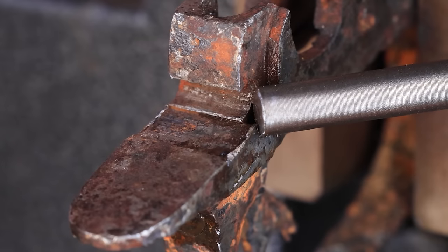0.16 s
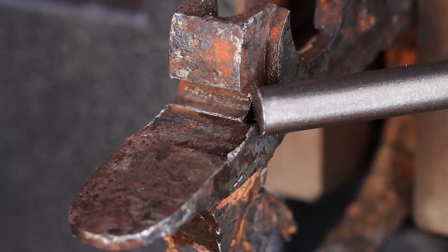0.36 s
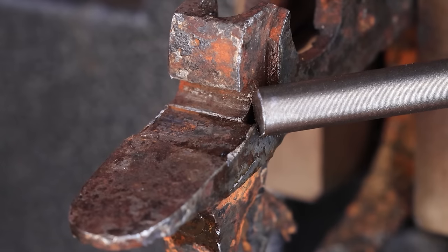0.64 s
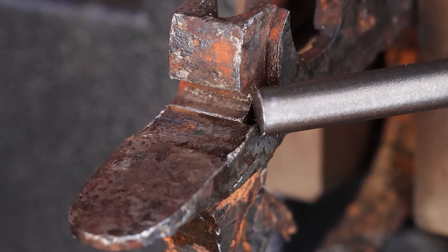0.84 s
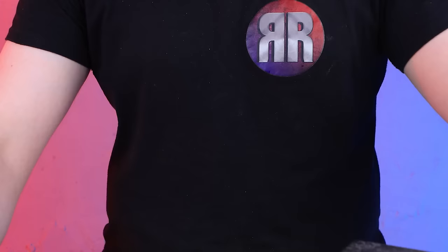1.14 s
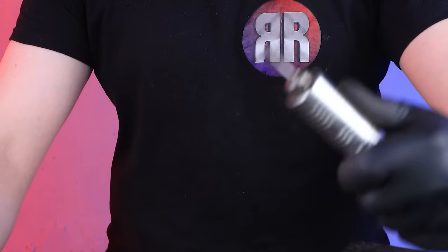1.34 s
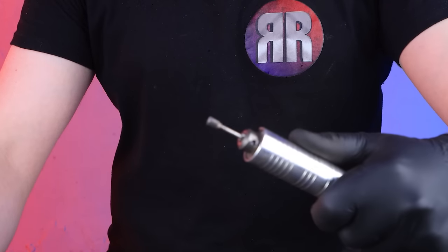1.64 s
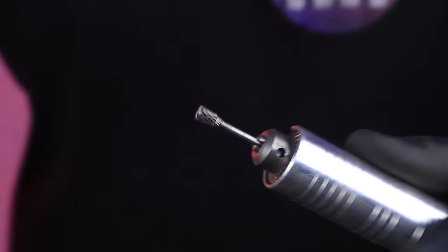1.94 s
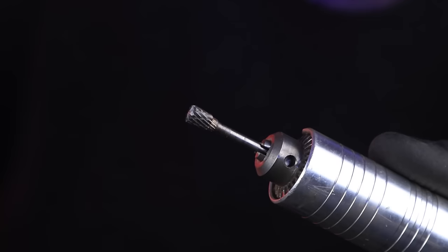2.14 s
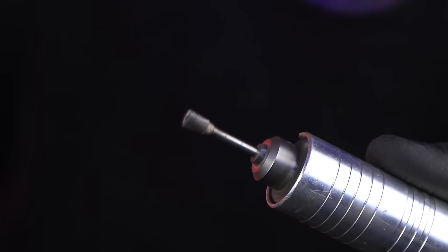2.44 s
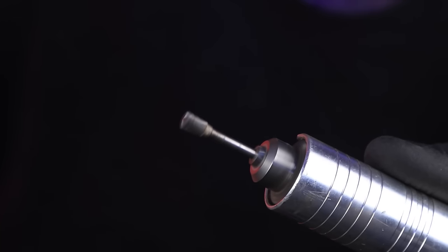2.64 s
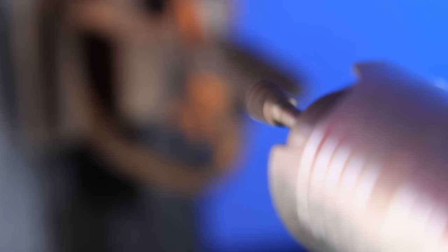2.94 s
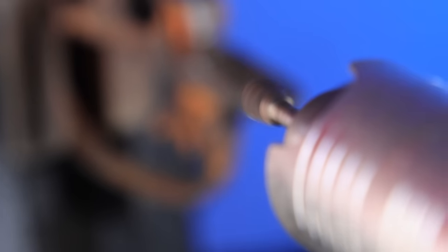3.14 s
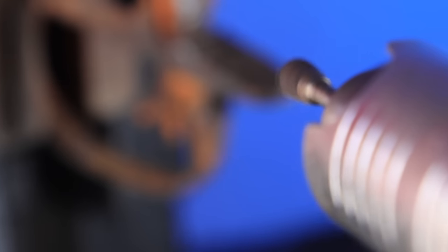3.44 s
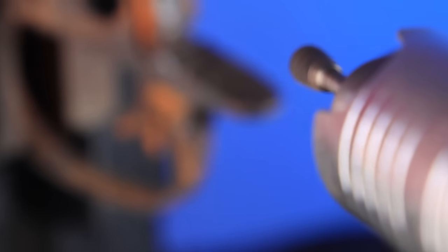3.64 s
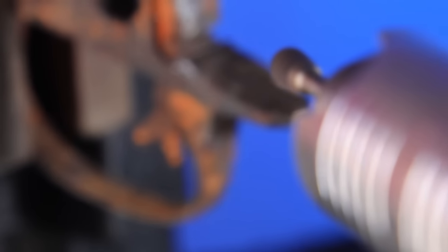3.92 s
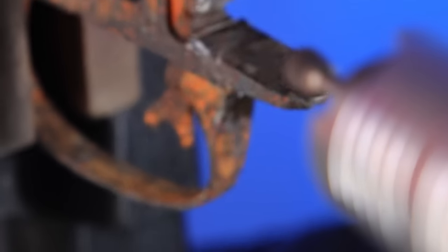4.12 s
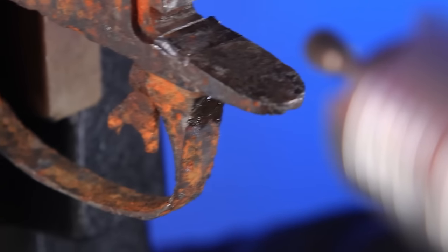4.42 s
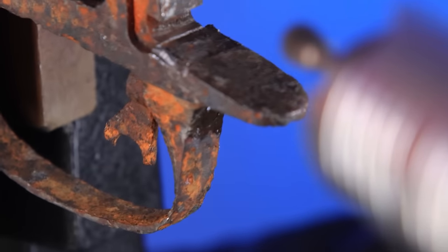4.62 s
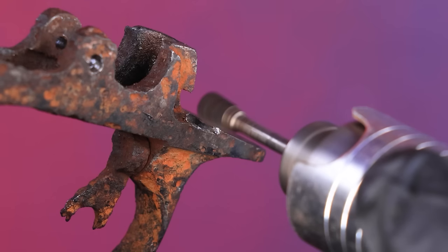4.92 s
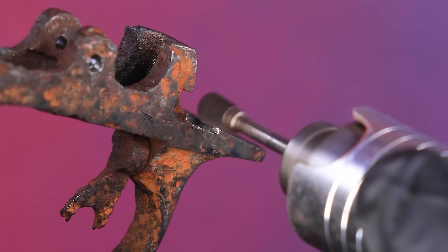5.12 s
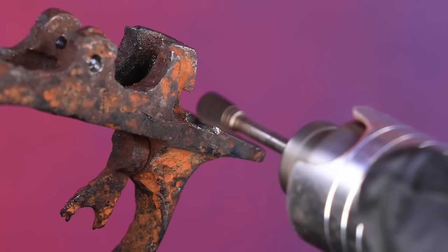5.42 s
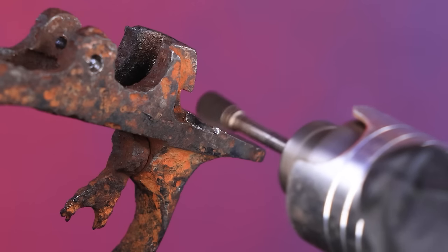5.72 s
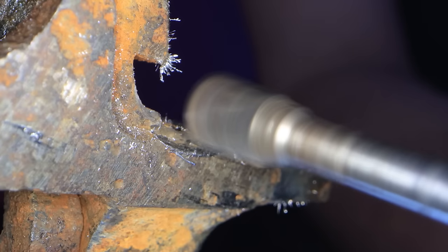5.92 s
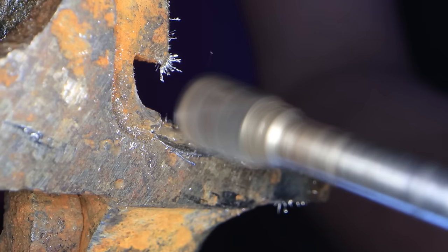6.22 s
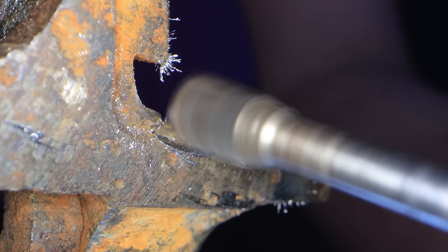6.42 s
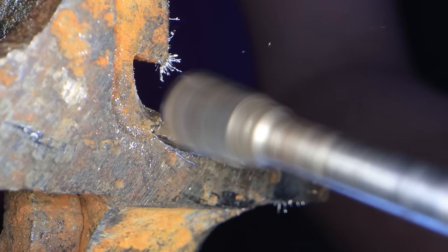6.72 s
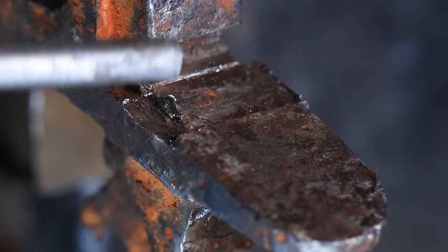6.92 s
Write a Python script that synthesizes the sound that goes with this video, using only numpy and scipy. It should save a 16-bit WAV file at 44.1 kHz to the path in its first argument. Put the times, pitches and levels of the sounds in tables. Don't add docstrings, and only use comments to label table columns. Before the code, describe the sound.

Fast hammer blows crack and ring on a punch, then a hush, two whiny revs of a rotary tool, free running, rattling cut and squealing grind.

```python
import sys
import numpy as np
from scipy import signal
from scipy.io import wavfile
from scipy.ndimage import uniform_filter1d, minimum_filter1d

SR = 44100
rng = np.random.default_rng(int(sys.argv[2]) if len(sys.argv) > 2 else 0)


def voltage_ratio(level):
    return 10 ** (np.asarray(level, float) / 20)


def unload_audio(sound):
    columns = np.transpose(np.atleast_2d(sound))
    steps = np.round(np.clip(columns, -1, 1) * 32767)
    wavfile.write(sys.argv[1], SR, steps.astype(np.int16))


N = 311346

# pitch_hz, level_db_per_hz
HUSH = [(18, -37.5), (30, -12), (79, -10), (153, -12), (336, -9), (554, -13.5), (721, -15), (1070, -17),
        (3000, -29), (6000, -40), (16000, -47)]
# pitch_hz, beat_hz, level_db
FAN = [(72.5, 3., -69.5), (143, 2.5, -72)]
# start_s, peak_db, pitch_hz, t60_s
THUMPS = [(1.441, -47, 52.9, 0.47), (1.592, -51, 57, 0.39), (2.38, -54, 52, 0.75), (2.579, -63, 61.4, 1.4),
          (2.84, -49.5, 58, 0.29), (4.83, -46, 55.3, 0.28), (5.06, -67, 58.4, 1.8), (5.5, -75, 58.3, 1.2),
          (6.84, -64.5, 44.8, 1.6), (6.96, -56, 38.1, 0.69)]
# start_s, peak_db, pitch_hz
TICKS = [(1.4194, -71, 2920), (1.5994, -73.5, 2880), (1.7638, -60, 3500), (1.813, -60, 5600),
         (2.2588, -60, 2200), (2.302, -31, 2960), (2.943, -34, 4500), (6.98, -61, 8750)]

# start_s, peak_db, then relative to it thud_db, ring_db, boom_db
BLOWS = [(-0.03, -20.5, -12.0, -9.5, -20.5), (0.093, -20, -9.5, -5, -20), (0.229, -19, -10.5, -5.5, -19.5),
         (0.355, -17.5, -10.5, -7, -20.5), (0.481, -17.5, -13, -5.5, -18),
         (0.616, -18.5, -16, -12.5, -19.5), (0.741, -14, -17, -14, -23.5), (0.87, -16, -12.5, -8.5, -17),
         (1.0, -16, -15.5, -10.5, -16.5), (1.125, -14.5, -16, -11, -16.5)]
# pitch_hz, level_db_per_hz
CLATTER = [(35, -34.5), (60, -15.5), (256, -8.5), (408, -0.5), (715, -17.5), (785, -14), (1440, -9),
           (2090, -13.5), (2580, -8.5), (4100, -7.5), (5590, -5.5), (7570, -10), (14500, -8), (16000, -24)]
# pitch_hz, t60_s
SHOP = [(200, 0.43), (530, 0.32), (1390, 0.31), (3680, 0.18), (9700, 0.043)]
# pitch_hz, width_hz, level_db, t60_s
STEEL = [(1470, 90, -3, .18), (1735, 60, -5, .18), (2550, 200, -5, .18), (3230, 300, -9, .15),
         (5650, 450, -4, .24), (6400, 400, -6, .18), (8870, 400, -2, .2), (9800, 500, 2, .15),
         (12100, 900, -3, .15), (13480, 70, -8, .2)]
# pitch_hz, level_db, t60_s
PART = [(1328, -1, .12), (1400, -3, .12), (1730, -3, .16), (2210, -11.5, .2), (2680, -9, .14),
        (3120, -9, .14), (3430, -6, .14), (4580, -6, .15), (5000, -6, .15), (5545, -6, .2), (5800, -8, .2),
        (6250, -8, .1), (6438, -10, .12)]
# pitch_hz, level_db, t60_s
BENCH = [(176.2, -1, 0.17), (336, -2.5, 0.11), (370.7, 1.5, 0.13), (395.7, 12, 0.063), (718, -5.5, 0.11)]
# pitch_hz, level_db under the blow, t60_s
LOOSE = [(937, -23, 0.14), (1410, -20.5, 0.18), (1720, -23, .25), (2245, -31, .2), (3180, -38, .12)]

# time_s, whine_hz
REVS = [
    (2.25, 1105),
    (2.34, 1965),
    (2.37, 2735),
    (2.393, 3175),
    (2.44, 3202),
    (2.53, 2654),
    (2.572, 3253),
    (2.62, 3240),
    (2.975, 1249),
]
# start_s, held_s, whine_db
PEDAL = [
    (2.357, 0.021, -26.5),
    (2.547, 0.026, -32),
]
# multiple, level_db
WHINE = [(2, -52), (3, -53), (4, -51), (5, -55), (6, -55), (7, -55), (8, -55), (9, -56), (10, -56),
         (11, -57), (12, -58)]
# pitch_hz, level_db_per_hz
REV_TONE = [(88, -82.5), (150, -43), (368, -16), (457, -4.5), (888, 3), (1260, -3.5), (2020, 2),
            (3040, 2.5), (3700, -1.5), (12900, -5.5), (16000, -5)]
# start_s, peak_db
SLAPS = [(2.423, -20.5), (2.4723, -21), (2.537, -21.5), (2.586, -19), (2.6369, -27), (2.6847, -24),
         (2.7364, -23), (2.784, -16), (2.832, -25), (2.8855, -13.5), (2.943, -11.5)]

# time_s, turns_per_s
FREE_TURNS = [(2.975, 114), (3.2, 116.2), (3.5, 117.2), (3.8, 115.8), (4.2, 114.9), (4.83, 114.2)]
# pitch_hz, level_db_per_hz
FREE_TONE = [(59, -85), (100, -54), (140, -59), (174, -25), (691, -37), (818, -24), (2270, -17.5),
             (2750, -2.5), (3400, -9.5), (6020, -2.5), (14400, -8.5), (16000, 2)]
# pitch_hz, width_hz, level_db
FREE_PEAKS = [(822, 42, -2), (1715, 24, 0.5), (2130, 54, -4.5), (2757, 20, -14), (4110, 320, 2),
              (5980, 120, -3), (7050, 99, 5), (7910, 61, -70), (9460, 1100, 4.5), (11300, 410, 6),
              (13550, 2300, 6)]
# start_s, length_s, pitch_hz, level_db
SIDE_TONES = [(3.15, .55, 3110, -62), (4.3, .62, 2896, -54), (4.42, .32, 2974, -56)]
# pitch_hz, regripped_hz, width_hz, level_db, loudest_s
PINGS = [(6900, 5800, 600, -46, 3.055), (11000, 12600, 650, -45, 3.025), (14100, 14600, 1000, -44, 3.015)]

# time_s, pressure_db, hum_hz
CUT = [(4.83, -35, 524), (4.85, -6, 524), (4.905, -19.5, 532), (4.99, -7, 531), (5.055, -23.5, 524),
       (5.11, -0.5, 526), (5.34, 5, 531), (5.4, 0.5, 498), (5.84, 1.5, 514)]
# first_s, last_s, gap_s, peak_db, shank_ring_db relative to it
SPELLS = [(4.8421, 4.8421, .05, -31, -1), (4.861, 4.879, .018, -34, -3), (4.9238, 4.9857, .0619, -39, -8),
          (5.011, 5.05, .013, -37, -8), (5.0623, 5.0765, .0142, -33, -6), (5.0902, 5.0902, .05, -26, -5),
          (5.1033, 5.157, .01335, -23, -4), (5.178, 5.178, .05, -24, -4), (5.169, 5.3762, .01884, -20, -8),
          (5.3951, 5.552, .01207, -24.5, 4), (5.563, 5.599, .0178, -21, -10),
          (5.6162, 5.6873, .0178, -19, 2), (5.6986, 5.7528, .018, -21, 2), (5.7631, 5.8336, .0176, -20, 1)]
# pitch_hz, level_db_per_hz
CUT_TONE = [(50, -60), (100, -40), (220, -34), (330, -35), (650, -29), (1150, -26), (1350, -19),
            (3000, -19), (4500, -18), (6000, -18), (9000, -17), (14000, -13), (15600, -13), (16000, -20)]
# pitch_hz, width_hz, level_db
CUT_PEAKS = [(1760, 150, -15), (5330, 350, -11), (7940, 500, -9), (11100, 400, -6), (12200, 600, -9),
             (14800, 370, -5)]
# pitch_hz, width_hz, level_db
GLINTS = [(11100, 160, -41), (12250, 300, -46), (14350, 350, -39), (14850, 300, -39)]

# pitch_hz, level_db_per_hz
GRIND_TONE = [(59, -66), (100, -50), (389, -50), (502, -10.5), (1250, -20.5), (1550, -6), (2860, -2.5),
              (3700, -8), (10900, -10), (13500, -0.5), (14400, -5), (16000, -6)]
# pitch_hz, width_hz, level_db
GRIND_PEAKS = [(5600, 1500, -6), (7940, 900, -2), (9270, 1600, -0.5), (12500, 8800, -3), (14400, 390, -20),
               (14580, 320, 8)]
# time_s, lower_db, upper_db
CATCHES = [(5.98, -45.5, -59), (6.054, -43, -45), (6.114, -42.5, -54), (6.254, -41, -54), (6.334, -41, -58),
           (6.4, -52, -61), (6.458, -44, -38.5), (6.514, -39, -39), (6.62, -40.5, -33), (6.68, -43.5, -48),
           (6.746, -48, -40), (6.806, -45, -43)]
# start_s, length_s, pitch_hz, level_db
SEATING = [(5.934, 0.1, 639, -43), (5.924, 0.1, 1055, -53.5), (6.114, 0.086, 703, -45.5),
           (6.119, 0.058, 1927, -35), (6.12, .03, 2140, -37), (6.15, .03, 2190, -44),
           (6.17, .06, 1930, -41), (6.198, 0.37, 513.4, -49.5), (6.206, 1, 2600, -46), (6.3, .5, 2990, -47),
           (6.617, .21, 2440, -39)]

SLIP_S, CUT_S = 0.8, 1.2
TOP_HZ, STARTED_S, START_DB_PER_S = 3190, 2.31, 807
PEDAL_RISE_DB_PER_S, PEDAL_FALL_DB_PER_S = 899, 342.5
GRIP_S, GRIP_DAMPING = 3.9, 0.35
BITE_S, SHAKE_S = 5.09, 5.22
GRIND_S, SEATED_S, SQUEAL_S, LIFT_S = 5.84, 5.95, 5.91, 6.841


def noise(n):
    return rng.standard_normal(n)


def sine(hz, t):
    return np.sin(2 * np.pi * hz * t)


def gliding(hz):
    return np.sin(2 * np.pi * np.cumsum(hz) / SR)


def dying(t, db, t60):
    return voltage_ratio(db - 60 * t / t60)


def ramp(t, start_s, length_s, low=0, high=1):
    return np.clip((t - start_s) / length_s, low, high)


def swell(t, start_s, length_s):
    return np.sin(np.pi * ramp(t, start_s, length_s)) ** .5


def evened(x):
    return x / np.sqrt(np.mean(x ** 2) + 1e-20)


def drift(n, size):
    return evened(uniform_filter1d(noise(n), size))


def read(points, hz):
    f, value = np.transpose(points)
    return np.interp(np.log(hz + 1), np.log(f + 1), value)


def unroll(rows):
    s, *columns = np.transpose(rows)
    t = np.arange(s[0], s[-1], 1 / SR)
    return [t] + [np.interp(t, s, c) for c in columns]


def add(mix, s, sound):
    at = round(s * SR)
    sound = sound[max(-at, 0):]
    part = mix[max(at, 0):][:len(sound)]
    part += sound[:len(part)]


def resonate(x, hz, width):
    turn = np.exp(2j * np.pi * np.cumsum(hz * np.ones(len(x))) / SR)
    r = np.exp(-np.pi * width / SR)
    return evened((turn * signal.lfilter([1 - r], [1, -r], x / turn)).real)


def resonate_twice(x, hz, width, hz2, width2):
    return resonate(resonate(x, hz, width), hz2, width2)


def coloured(x, tone, peaks=(), peaks_db=0.):
    hz = abs(np.fft.fftfreq(4096, 1 / SR))
    power = voltage_ratio(read(tone, hz)) ** 2 + 1e-10
    for f, width, db in peaks:
        power = power + voltage_ratio(db + peaks_db) ** 2 / (1 + (2 * (hz - f) / width) ** 2) ** 2
    log_gain = np.log(power) / 2
    taps = np.fft.ifft(np.exp(np.conj(signal.hilbert(log_gain)))).real
    return evened(signal.oaconvolve(x, taps[:2048])[:len(x)])


def patchy(x, patchy_db):
    z = signal.stft(x, nperseg=256)[2]
    field = uniform_filter1d(noise(z.shape), 5, 0)
    field = evened(uniform_filter1d(field, 30, 1))
    return evened(signal.istft(z * voltage_ratio(patchy_db * field), nperseg=256)[1][:len(x)])


def flaring(clicks, decay_s, steady, sharp):
    flare = signal.lfilter([1], [1, -np.exp(-1 / (decay_s * SR))], clicks)
    return sharp * clicks + (steady + flare) * noise(len(clicks))


def knocks(rate, jitter, spread_db, decay_s, steady, sharp=0., beat_hz=10., beat=0., between=0.):
    n = len(rate)
    turns = np.cumsum(rate * np.exp(jitter * drift(n, 500))) / SR
    size = voltage_ratio(spread_db * noise(n))
    size *= 1 + beat * sine(beat_hz, np.arange(n) / SR)
    clicks = size * (np.diff(np.floor(turns), prepend=0) > 0)
    clicks += between * size * (np.diff(np.floor(3 * turns), prepend=0) > 0)
    return flaring(clicks, decay_s, steady, sharp)


def hush():
    return voltage_ratio(-69) * coloured(noise(N), HUSH)


def far_fan():
    t = np.arange(N) / SR
    tones = sum(voltage_ratio(db) * sine(hz, t) * np.cos(np.pi * beat_hz * (t - 3.36)) for hz, beat_hz, db in FAN)
    return (t > CUT_S) * tones


def thumps():
    out, t = np.zeros(N), np.arange(SR) / SR
    for s, db, hz, t60 in THUMPS:
        rise = (1 - np.exp(-t / 0.024)) ** 2
        add(out, s, rise * dying(t, db + 10, t60) * sine(hz, t))
    return out


def ticks():
    out, t = np.zeros(N), np.arange(400) / SR
    for s, db, hz in TICKS:
        add(out, s, voltage_ratio(db) * np.exp(-t / .0015) * (sine(hz, t) + .4 * np.diff(noise(401))))
    return out


def blow(peak_db, thud_db, ring_db, boom_db):
    t = np.arange(SR // 3) / SR
    hz, frames, z = signal.stft(coloured(noise(len(t)), CLATTER), SR, nperseg=128)
    z = z * dying(frames, 0, read(SHOP, hz)[:, None])
    tail = signal.istft(z, SR, nperseg=128)[1][:len(t)]
    crack = tail * (1 + 14 * np.exp(-t / .006) + 12 * np.exp(-t / .0015))
    steel = np.zeros(len(t))
    for f, width, db, t60 in STEEL:
        steel += dying(t, db + 2 * noise(1), t60) * resonate(noise(len(t)), f, width)
    for f, db, t60 in PART:
        steel += dying(t, db - 6.5 + 2 * noise(1), t60) * sine(f, t)
    steel *= 1 + 2 * np.exp(-t / .006)
    thud = sum(dying(t, db + 0.52 * noise(1), t60) * sine(f, t) for f, db, t60 in BENCH)
    thud *= 1 - np.exp(-t / 0.003)
    boom = (1 - np.exp(-t / 0.025)) * dying(t, 0, 0.18) * sine(105, t)
    out = voltage_ratio(-16.5) * crack + voltage_ratio(ring_db - 8.5) * steel
    out += voltage_ratio(thud_db) * thud + voltage_ratio(boom_db + 9) * boom
    return voltage_ratio(peak_db) * out


def hammer():
    out, t = np.zeros(N), np.arange(N) / SR
    short = t[:SR // 3]
    for s, peak_db, *parts_db in BLOWS:
        add(out, s + .0006, blow(peak_db, *parts_db))
        if s > SLIP_S:
            add(out, s, sum(dying(short, peak_db + db, t60) * sine(hz, short) for hz, db, t60 in LOOSE))
    slip = np.interp(t, [.724, .732, .741, .743], [0.02, 0.4, 0.38, 0.049])
    out += voltage_ratio(-31.5) * slip * resonate(noise(N), 2300, 2000)
    out += (t > .741) * dying(abs(t - .741), -35.5, 0.16) * resonate(noise(N), 2200, 74)
    room = (t > CUT_S) * dying(abs(t - CUT_S), -51.5, 0.15) * resonate(noise(N), 1060, 150)
    return out * np.interp(t, [CUT_S - .006, CUT_S, CUT_S + 0.26], [1, .1, 0]) + room


def brush_whine(t, hz, turns):
    whine_db = np.max([db + np.minimum(0, np.minimum(PEDAL_RISE_DB_PER_S * (t - s),
                                                     PEDAL_FALL_DB_PER_S * (s + held - t)))
                       for s, held, db in PEDAL], axis=0)
    throb = 2.5 * np.cos(np.pi * turns / 22) ** 4
    tone = throb * np.sin(2 * np.pi * turns) + 0.56 * resonate(noise(len(t)), hz, 350)
    return np.clip((hz - 2150) / 600, .05, 1) * voltage_ratio(whine_db + 4) * tone


def brush_overtones(t, hz, turns, octaves):
    upper = np.zeros(len(t))
    for k, db in WHINE:
        level = voltage_ratio(db - 4 * (k > 3) * octaves) * (k * hz < SR / 2)
        upper += level * voltage_ratio(4.5 * drift(len(t), 500)) * np.sin(2 * np.pi * k * turns)
    return upper * ramp(t, 2.3, 0.057, .1) * np.sqrt(hz / TOP_HZ)


def revs():
    t, hz = unroll(REVS)
    octaves = np.log2(hz / TOP_HZ)
    start_db = START_DB_PER_S * np.minimum(t - STARTED_S, 0)
    climbing = uniform_filter1d(1. * (np.gradient(hz) > 0), size=900)
    pulling = climbing * np.clip(-octaves, 0, 1)
    noise_db = -28 + 10.5 * octaves + 9 * pulling + start_db
    growl_db = -50.5 + 21.5 * octaves + start_db
    turns = np.cumsum(hz * (1 + 0.016 * drift(len(t), 60))) / SR
    slap = np.ones(len(t))
    for s, db in SLAPS:
        slap += voltage_ratio(db + 40) * np.exp(-((t - s - .004) / 0.0047) ** 2)
    drive = knocks(hz / 22, jitter=.1, spread_db=4., decay_s=.0006, steady=1.)
    sleeve = resonate_twice(drive, 10000, 7000, 11200, 9000)
    sleeve += 0.83 * resonate(drive, 12900, 700) + 0.55 * resonate(drive, 9500, 900)
    rush = coloured(drive, REV_TONE) + 0.073 * slap * sleeve
    rush += 0.19 * np.clip(-octaves + 0.49, 0, 1) * resonate(drive, 3000, 300)
    out = brush_whine(t, hz, turns) + voltage_ratio(noise_db - 7) * rush
    out += voltage_ratio(noise_db + 37) * brush_overtones(t, hz, turns, octaves)
    out += voltage_ratio(growl_db + 5.5) * resonate_twice(drive[::-1], 860, 380, 820, 340)
    return t[0], out


def bearing_pings(t, turns):
    clicks = (np.diff(np.floor(turns), prepend=0) > 0) * voltage_ratio(2.9 * noise(len(t)))
    grip = ramp(t, GRIP_S, .4)
    out = np.zeros(len(t))
    for hz, later_hz, width, db, s in PINGS:
        hz = hz + (later_hz - hz) * grip
        beats = 1 + .6 * np.cos(2 * np.pi * 9.8 * (t - s))
        struck = clicks * (1 - GRIP_DAMPING * grip) * beats
        out += voltage_ratio(db) * resonate_twice(struck, hz, width, hz, 2 * width)
    return out


def side_tones(t, drive):
    out = np.zeros(len(t))
    for s, length, hz, db in SIDE_TONES:
        out += voltage_ratio(db + 2) * swell(t, s, length) * (np.sqrt(2) * sine(hz, t) + 0.15 * resonate(drive, hz, 25))
    return out


def running():
    t, rate = unroll(FREE_TURNS)
    drive = knocks(rate, jitter=.001, spread_db=1., decay_s=.0012, steady=.32, sharp=.3, beat=.1, between=.3)
    even = knocks(rate, jitter=.001, spread_db=1., decay_s=.002, steady=.9, between=.5)
    low_pass = signal.butter(2, 7000, fs=SR)
    drive = evened(drive) + signal.lfilter(*low_pass, evened(even) - .75 * evened(drive))
    body = patchy(coloured(drive, FREE_TONE, FREE_PEAKS, peaks_db=-5.), patchy_db=2.)
    body += ramp(t, 3.9, .5) * 0.15 * resonate_twice(drive, 6100, 1000, 6150, 1200)
    body += ramp(t, 3.9, -0.98) * 0.055 * resonate_twice(drive, 7200, 600, 7000, 800)
    turns = np.cumsum(rate) / SR
    throb = .9 * ramp(t, 4.4, -.4, .3)
    whine = (1 + throb * np.cos(2 * np.pi * .648 * turns)) * np.sin(2 * np.pi * 24 * turns)
    ring = 1.1 * whine + .3 * resonate(drive, 2575, 100)
    ring += .35 * resonate_twice(drive, 24 * rate, 200, 24 * rate, 300)
    whirr = resonate_twice(noise(len(t)), 1700, 740, 950, 480)
    out = voltage_ratio(-30.5) * body + voltage_ratio(-47.5) * ring
    out += voltage_ratio(-49.5 - 7 * (t - t[0])) * whirr
    return t[0], out + side_tones(t, drive) + bearing_pings(t, turns)


def bounces(t):
    rows = [(s, peak, ring) for first, last, gap, peak, ring in SPELLS
            for s in np.arange(first, last + gap / 2, gap)]
    rows = np.array(rows) + 1.3 * noise((len(rows), 3)) * [0, 1, 1]
    s, peak_db, ring_db = rows.T
    at = ((s + 0.0012 - t[0]) * SR).astype(int).clip(0, len(t) - 1)
    hits, snaps = np.zeros(len(t)), np.zeros(len(t))
    hits[at], snaps[at] = voltage_ratio(peak_db + ring_db + 25), voltage_ratio(peak_db + 25)
    return hits, snaps


def cutting():
    t, press_db, hum_hz = unroll(CUT)
    jolt_db = 10 * np.exp(-((t - 5.214) / .035) ** 2)
    scrape_db, hum_db = -28 + 0.17 * press_db, -34 + press_db + 0.29 * jolt_db
    buzz_db = -52 + 0.81 * press_db + jolt_db
    hits, clicks = bounces(t)
    beats = 1. * (clicks > 0)
    bounce = evened(flaring(hits, decay_s=.0015, steady=0, sharp=16.))
    scrape = evened(flaring(np.sqrt(clicks), decay_s=.005, steady=.4, sharp=0))
    snaps = evened(flaring(clicks, decay_s=.0009, steady=0, sharp=3.))
    teeth = knocks(166. + 0 * t, jitter=.03, spread_db=4., decay_s=.001, steady=.3, sharp=2.)
    body = patchy(coloured(scrape + .5 * teeth, CUT_TONE, CUT_PEAKS, peaks_db=-3.), patchy_db=1.2)

    bounce += 0.83 * evened(teeth) * ramp(t, 5.3, 0.28)
    chatter = resonate_twice(bounce, 2730, 150, 2730, 300)
    chatter += .7 * resonate_twice(bounce, 2540, 100, 2540, 250) + .4 * resonate(bounce, 2330, 70)
    rattle = voltage_ratio(-36.5) * chatter + voltage_ratio(-37) * resonate_twice(snaps, 3900, 1500, 4000, 1500)
    for hz, width, db in GLINTS:
        rattle += voltage_ratio(db) * resonate_twice(snaps + 0.16 * teeth, hz, width, hz, 2 * width)
    shake = beats * ramp(t, SHAKE_S, 0.02) * ramp(t, 5.5, -0.13, .5)
    vice = resonate_twice(shake, 110, 60, 110, 60) + 1.8 * resonate_twice(shake, 223, 63, 178, 90)
    rattle += voltage_ratio(-64.5) * vice
    rattle += voltage_ratio(-51) * resonate(teeth, 1290, 30) + voltage_ratio(-54) * resonate(teeth, 920, 50)

    overtone = resonate_twice(beats, 880, 50, 785, 200)
    overtone *= ramp(t, 5.17, 0.0096, .3) * ramp(t, 5.55, -0.16, .6, 1.3)
    buzz = resonate(bounce, 940, 70) + resonate(bounce, 1410, 40) + 0.07 * resonate(teeth, 730, 180)
    buzz += 1.8 * overtone + 3.3 * (t > BITE_S - .02) * resonate(teeth, 1726, 63)

    before_bite = ramp(t, BITE_S + .02, -.02, .05)
    hum = before_bite * gliding(hum_hz)
    hum += .62 * resonate_twice(beats, 510, 45, 510, 130)
    hum += .25 * resonate_twice(teeth, hum_hz, 50, hum_hz, 110)
    hum *= ramp(t, t[-1], -.006)
    return t[0], voltage_ratio(scrape_db) * body + rattle + voltage_ratio(buzz_db - 5.5) * buzz + voltage_ratio(hum_db) * hum


def squeal(t, settle, flicker, rate):
    hz = 14715
    waver = 18 * drift(len(t), 2500) + 35 * drift(len(t), 200)
    waver += 55 * gliding(54 * (1 + .1 * flicker))
    out = gliding(hz + waver) + 0.5 * resonate_twice(noise(len(t)), hz - 40, 200, hz - 40, 300)
    out *= 1 + .3 * np.cos(2 * np.pi * 520 * t)
    out *= 1 + .7 * settle * np.cos(2 * np.pi * rate * (t - 5.918))
    growth_db = -16.5 - 15 * np.exp(-(t - GRIND_S) / 0.3)
    return voltage_ratio(growth_db) * out * ramp(t, SQUEAL_S, .02, .2)


def grinding():
    t = np.arange(GRIND_S, LIFT_S, 1 / SR)
    done = (t - GRIND_S) / (LIFT_S - GRIND_S)
    flicker = drift(len(t), 1500)
    settle = np.clip(1 - (t - t[0]) / .38, 0, 1)
    rate = 75 + 0 * t
    bounce = knocks(rate, jitter=.004, spread_db=1.5, decay_s=.0006, steady=0, sharp=12.)
    bounce = settle ** .4 * np.roll(bounce, -290)
    teeth = knocks(3.5 * rate, jitter=.08, spread_db=3., decay_s=.0014, steady=.6, sharp=1.)
    body = patchy(coloured(.06 * bounce + .4 * teeth, GRIND_TONE, GRIND_PEAKS, peaks_db=-2.5), patchy_db=-1.)
    under = signal.sosfiltfilt(signal.butter(4, 2050, fs=SR, output="sos"), body)
    body = body - 0.55 * ramp(t, SEATED_S + .02, -0.037) * under
    out = voltage_ratio(-29.5 + 5.5 * done) * body
    shank_hz = 2900. - 480. * settle
    chatter = resonate_twice(bounce + .1 * teeth, shank_hz, 380, shank_hz, 450)
    out += voltage_ratio(-41.5 - 0.5 * np.sqrt(done)) * chatter
    low_hz = 1535. - 25. * settle
    low_db = -61 + 12.5 * flicker + 410 * np.minimum(t - SEATED_S, 0)
    out += voltage_ratio(low_db) * resonate(teeth, low_hz, 23)
    out += squeal(t, settle, flicker, rate)
    for s, lower_db, upper_db in CATCHES:
        rings = voltage_ratio(lower_db + 4.5) * gliding(low_hz) + voltage_ratio(upper_db + 3) * sine(1807, t)
        out += np.exp(-((t - s) / 0.019) ** 2) * rings
    for s, length, hz, db in SEATING:
        tone = sine(hz, t) + .2 * resonate_twice(teeth, hz, 26, hz, 58.6)
        out += voltage_ratio(db) * swell(t, s, length) * tone
    return t[0], out


def scene():
    mix = hush() + far_fan() + thumps() + ticks() + hammer()
    for part in (revs, running, cutting, grinding):
        add(mix, *part())
    low = signal.lfilter(*signal.butter(2, 750, fs=SR), mix)
    side = .08 * low + voltage_ratio(-35) * np.roll(mix, 300)
    return np.array([mix - side, mix + side])


def top_cut(x):
    return signal.sosfilt(signal.butter(12, 16830, fs=SR, output="sos"), x)


def record(dry):
    ceiling = .175
    peak = -minimum_filter1d(-abs(dry).max(0), size=40)
    held = dry * uniform_filter1d(np.minimum(1, ceiling / (peak + 1e-9)), size=20)
    edge = signal.firwin(1501, 15730, window=("kaiser", 9), fs=SR)
    return top_cut(signal.oaconvolve(held, edge[None], "same"))


dry = scene()
out = record(dry)
unload_audio(out)
```